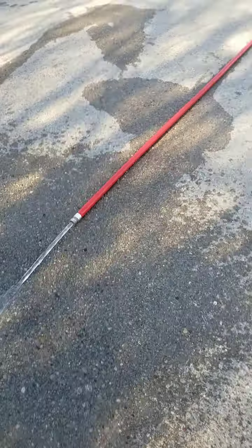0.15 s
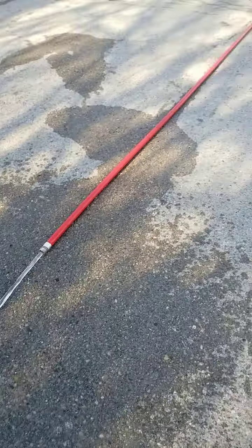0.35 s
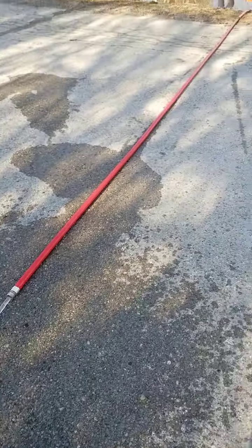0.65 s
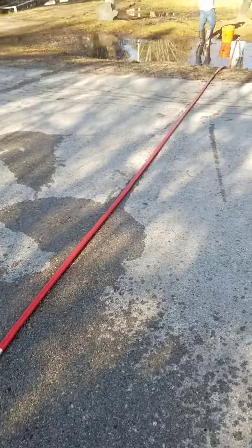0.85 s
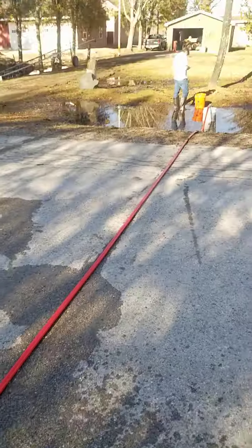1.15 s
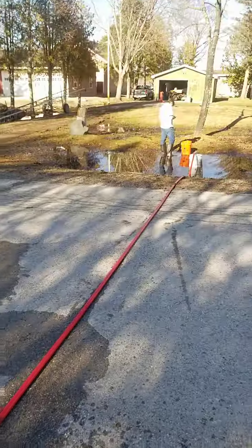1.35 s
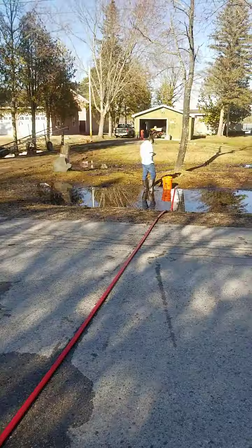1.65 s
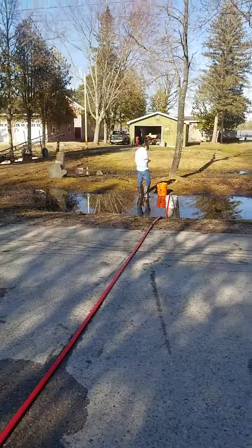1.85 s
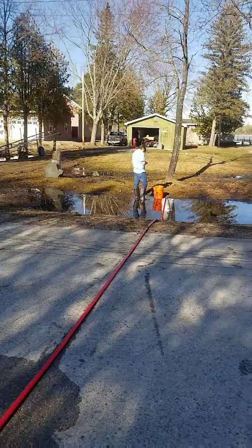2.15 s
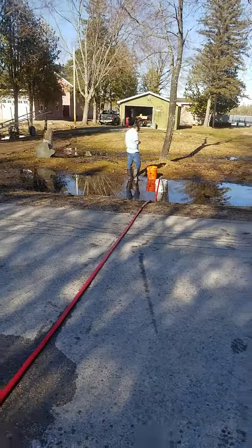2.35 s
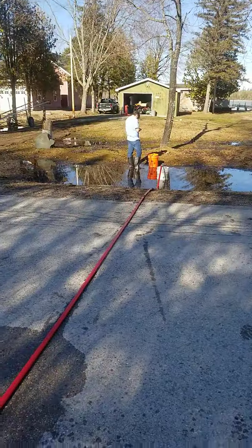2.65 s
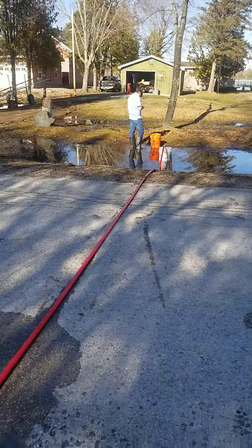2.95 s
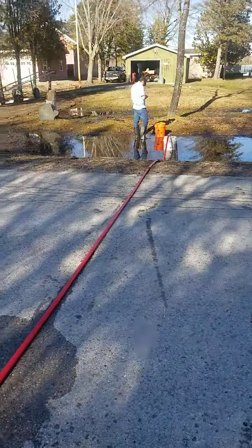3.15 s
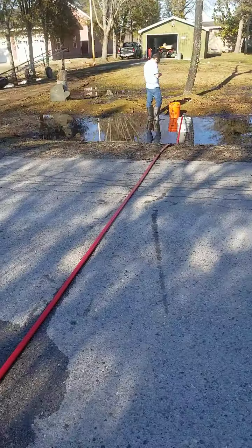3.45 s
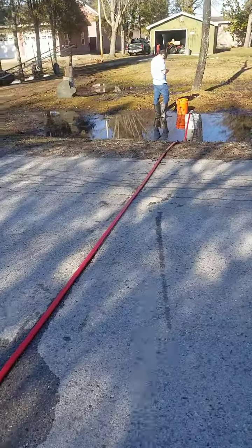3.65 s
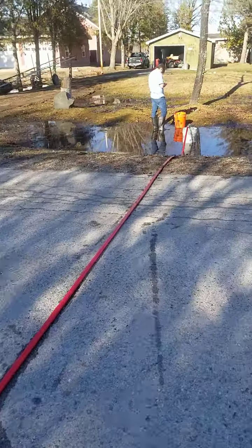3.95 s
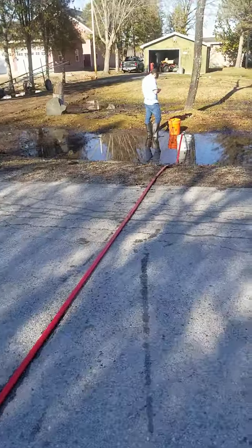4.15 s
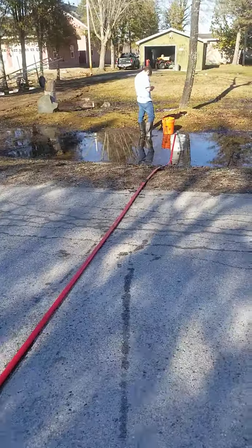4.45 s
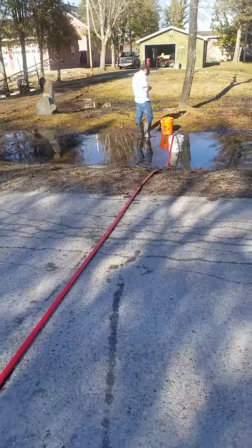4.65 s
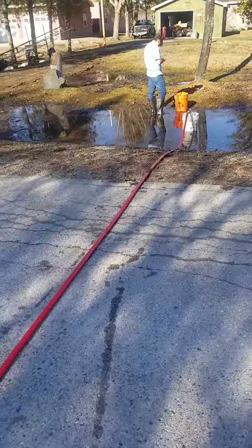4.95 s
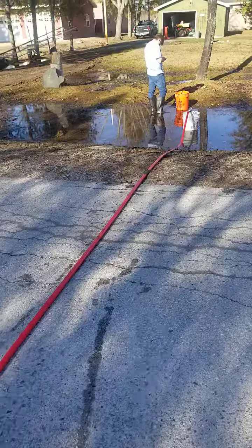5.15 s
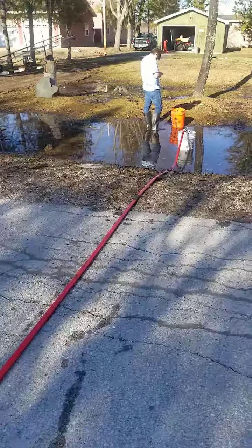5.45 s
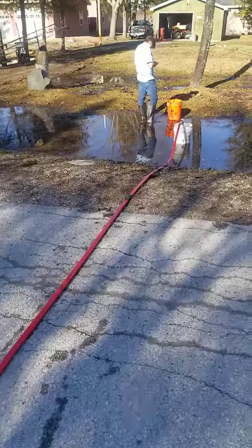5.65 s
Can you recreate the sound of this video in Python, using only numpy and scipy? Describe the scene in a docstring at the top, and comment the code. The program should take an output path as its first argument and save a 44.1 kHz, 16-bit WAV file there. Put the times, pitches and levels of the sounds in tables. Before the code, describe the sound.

Close, dense water spray dominates, a steady wide-band hiss with fine droplet crackle and little bubble plops, leaning right. Knocks on the handheld stereo device open the scene. After about three seconds, footsteps scuff sandy pavement and the spray gradually fades and dulls; low, ragged wind buffets thump the microphone, especially its right side. Distant motors drone faintly outdoors, and one soft bird whistle comes near the end.

```python
"""Hose spray on a paved road

Pumped water jets from a hose and spatters; random ticks and ringing bubbles make the splash, to the right.
The listener turns away and walks toward the pump, so the spray fades and dulls.
Pump and engine hum far off as wavering partials over coloured-noise air; a gliding sine is one bird call.
Noise gusts and short swings of pressure buffet two microphone ports; struck resonances make the knocks,
plops and grit, and coloured grains the scuffing soles."""
import sys
import numpy as np
from scipy import signal
from scipy.fft import rfft, irfft, next_fast_len
from scipy.io import wavfile
from scipy.ndimage import uniform_filter1d, map_coordinates

SR = 44100
rng = np.random.default_rng(int(sys.argv[2]) if len(sys.argv) > 2 else 0)


def master_out(mix):
    """Clip the mix to full scale and print it as 16-bit PCM to the path in sys.argv[1]."""
    frames = np.transpose(np.atleast_2d(mix))
    ceiling = np.clip(frames, -1, 1)
    pcm = np.round(ceiling * 32767).astype(np.int16)
    wavfile.write(sys.argv[1], SR, pcm)


N = 255548
TIME = np.arange(N) / SR  # s

# Spray bearing and how unlike the two ports sound: time_s, left_port_lag_ms, relative_width
BEARING = [(0, 0.15, 15), (.22, 0.22, 2.2), (.4, 0.26, 1.9), (.65, .3, 5.2), (.95, 0.37, 5.8),
           (1.3, 0.44, 1.2), (1.55, 0.47, 0.87), (1.85, 0.47, 0.59), (2.45, 0.45, 0.54), (3.05, 0.46, 1.4),
           (3.6, 0.477, 0.39), (4.15, 0.51, 0.21), (4.8, 0.49, 0.29), (5.15, 0.49, 1.2), (5.79, 0.49, 3.5)]
# Splash loudness where the listener first stands: time_s, level_db
JET_LEVEL = [(0, -1.7), (.35, -0.25), (1.05, -0.36), (2.1, -0.5), (2.65, 0.77), (3.4, 0.5)]
# Base splash spectrum at each port: freq_hz, density_db_per_hz
SPLASH_LEFT = [(700, -106), (1000, -94.5), (1400, -86.5), (1900, -78.4), (2600, -73.2), (3700, -74.8),
               (4900, -78.3), (6200, -83.5), (6900, -84.3), (7800, -82), (9000, -89.5), (10500, -87.5),
               (12500, -84.3), (15600, -84)]
SPLASH_RIGHT = [(700, -106), (1000, -95), (1400, -87.5), (1900, -78.3), (2700, -72.3), (4600, -72.7),
                (5300, -73.8), (6300, -70.8), (6900, -75), (7950, -66.8), (9100, -73), (10700, -69.2),
                (11400, -70.4), (12500, -65), (14500, -74), (15700, -83.5)]
# Splash power common to both ports at width 1: freq_hz, share_0_to_1
SPLASH_SHARED = [(2000, 0.97), (3300, 0.96), (4900, 0.93), (6000, 0.25), (8000, 0.56), (12000, 0.6),
                 (15500, 0)]
# Turn past the spray: time_s, heading (0 ahead, 1 beside, 2 behind)
HEADING = [(.7, 0.3), (1.5, 1.1), (3.55, 1), (4.05, 1.4)]
# Left-port phase lead from the path round the casing, per heading: freq_hz, lead_turns
LEAD_AHEAD = [(1700, -0.016), (2400, 0.0044), (3200, 0.021), (4900, 0.21), (5700, .35), (7900, 0.67)]
LEAD_BESIDE = [(1700, -0.0081), (2400, 0.00096), (3300, 0.0058), (4100, -0.039), (5700, .03), (6600, 0.34),
               (7900, 0.32), (10500, 0.77), (14500, 0.78)]
LEAD_BEHIND = [(1700, 0.027), (2800, 0.064), (4100, 0), (4900, -0.17), (5700, -0.15), (7900, -0.12),
               (10500, 0.46), (14500, 1)]
# Bands of the hiss that weaken, or swell (negative loss), for a while:
# start_s, end_s, centre_hz, width_hz, left_loss_db, right_loss_db
DIPS = [(-0.5, 0.85, 3860, 447, 4.5, 1.5), (0, 0.86, 9800, 1000, 1.5, 1.5),
        (-0.3, 2.25, 13500, 710, -0.5, 2.5), (1.15, 4.2, 3280, 170, -2, 0.5), (1, 3.84, 5700, 800, 4, 1),
        (3.5, 4.6, 4500, 770, -2.5, 1), (3, 4.6, 6900, 700, 3, -0.5), (3.7, 6.5, 9700, 800, 4, 1.5),
        (5, 6, 5500, 700, 2, -3)]
DIP_FADE_S = 0.44
# Broad dip cast by the casing on the right port: time_s, depth_db
CASING_SHADE = [(0, -2), (3.3, -0.5), (4.1, 1.5), (4.7, 8), (5.79, 12)]
CASING_SHADE_HZ, CASING_SHADE_WIDTH_HZ = 4780, 1220
# Treble shaded by the listener's body: time_s, left_loss_db, right_loss_db
BODY_SHADOW = [(1, 0, -1.5), (3.5, -1, -0.16), (4.4, 4, -0.4), (5.1, 12, 5), (5.3, 15, 10.5),
               (5.79, 21, 13)]
# Walk away from the splash
WALK_FROM_S, WALK_M_PER_S, SPLASH_DISTANCE_M = 3.14, 0.94, 1.064
# Extra left-port treble while facing the spray, lost on turning
FACING_DB, TURN_S = 9, 0.69
# Grip shift takes treble from the right port: a finger shades it, then eases off
GRIP_S, GRIP_TAKES_S, OPEN_PORT_DB = 0.14, 0.037, 1.5
GRIP_SHADE_DB, GRIP_EASE_S = 3, 0.43

# Partials of the mains pump motor: multiple, level_db
PUMP_PARTIALS = [(2, -69), (4, -66.5), (6, -78), (10, -57), (14, -86)]
PUMP_HZ = 60.15
# Partials of the far engine: multiple, level_db
ENGINE_PARTIALS = [(2, -68.5), (3, -63), (4, -69), (7, -74), (8, -83)]
ENGINE_HZ = 77.4
# Outdoor air and the pump's churning: freq_hz, density_db_per_hz
AIR_COLOUR = [(25, -86), (60, -110), (130, -85.5), (240, -77.5), (330, -88), (430, -91), (620, -82.5),
              (730, -87.5), (850, -94.5), (1100, -94), (2000, -104.5), (5000, -106), (15000, -116)]
# Far sounds during the walk toward the pump: time_s, gain_db
APPROACH = [(0, -1.5), (2.2, -2), (3.3, -0.5), (5.79, 2)]

# Wind rumble spectrum before levelling: freq_hz, density_db_per_hz
WIND_COLOUR = [(20, -36), (31, -10), (43, 0.5), (66, 5.5), (100, -3.5), (140, -11), (250, -21.5),
               (500, -40.5), (1500, -43.5)]
# Gusts: start_s, hold_s, left_level_db, right_level_db
GUSTS = [(0.02, 0.55, -68, -56), (0.687, 0.12, -54, -57), (.9, 0.78, -79, -66), (2.197, 0.094, -66, -56),
         (2.647, 0.51, -56, -47), (2.98, 0.067, -38, -35), (3.22, .25, -59, -54), (3.53, .15, -71, -40.5),
         (3.853, 0.45, -56, -34.5), (4.39, 0.44, -49, -47), (4.917, 1, -47.5, -36.5)]
GUST_ATTACK_S, GUST_RELEASE_S = 0.049, 0.043
BREEZE_LEFT_DB, BREEZE_RIGHT_DB = -76, -72
# Single eddies, before raggedness: start_s, pitch_hz, left_peak_db, right_peak_db
BUFFETS = [(.135, 95, -43, -41), (0.164, 185, -39, -50), (.182, 200, -45, -54), (.238, 64, -56, -39),
           (0.416, 57, -64, -35), (.695, 69, -35, -58), (0.764, 100, -46, -56), (1.193, 70, -65, -51),
           (2.568, 105, -47, -60), (2.641, 70, -59, -41), (2.821, 54.7, -49, -30), (2.907, 68, -35.5, -48),
           (2.968, 141, -24, -22), (3.008, 190, -34, -29), (3.036, 161, -31, -28), (3.048, 177, -32, -28),
           (3.061, 150, -34, -27.5), (3.197, 125.8, -35, -31.5), (3.683, 75, -46, -38),
           (3.83, 85, -38, -32), (3.93, 124.8, -42, -30.5), (3.968, 111, -46, -27), (4.074, 68, -40, -28),
           (4.275, 70, -53, -35), (4.589, 65.5, -39, -36), (4.669, 162, -34, -31.5),
           (4.731, 73.2, -34, -31), (4.975, 76, -50, -24), (5.143, 114, -38, -27.5), (5.295, 127, -31, -29),
           (5.361, 62, -44, -18), (5.653, 65, -52, -25.5), (5.762, 111.7, -53, -24)]

# Knocks and rubs on the casing, before its thud:
# start_s, pitch_hz, decay_s, left_peak_db, right_peak_db
KNOCKS = [(.012, 835, 0.00088, -25.5, -49), (.094, 1110, 0.0016, -37, -36), (.127, 655, 0.02, -29.5, -46),
          (.1445, 460, 0.0012, -22.5, -37), (.842, 584, 0.005, -36, -58), (1.568, 560, 0.0031, -35, -53),
          (2.240, 575, 0.031, -34, -59), (2.972, 600, 0.005, -39, -36), (3.020, 845, 0.006, -42, -39),
          (3.043, 1110, 0.0037, -40, -40), (3.199, 600, .004, -49, -49), (3.867, 1010, .002, -44, -45),
          (3.905, 792, 0.0034, -44, -41), (4.312, 900, 0.0025, -46, -40), (4.585, 1000, .002, -52, -45),
          (4.910, 1690, .003, -35, -34), (5.30, 388, 0.011, -39, -42.5)]
# Larger bubbles in the puddle: start_s, pitch_hz, decay_s, left_peak_db, right_peak_db
PLOPS = [(.949, 2300, 0.0036, -33, -33), (2.336, 1630, .003, -37, -46), (3.123, 2080, .003, -33, -31),
         (3.167, 2100, .003, -32, -30), (3.237, 1920, 0.0036, -32, -29)]
# Soles on the sandy road: start_s, length_s, level_db
SCUFFS = [(1.25, 0.5, -62), (2.08, .32, -64.5), (3.148, 0.38, -59), (3.95, 0.31, -64), (5.15, 0.4, -57.5)]
# Scuff spectrum before levelling: freq_hz, density_db_per_hz
SCUFF_COLOUR = [(150, -14), (400, 3.5), (900, 1), (1500, -3), (3000, -15), (8000, -32)]
# Grit ticks on the road: start_s, pitch_hz, decay_s, left_peak_db, right_peak_db
GRIT = [(3.988, 12000, 0.0025, -39, -19), (4.487, 11500, .003, -41, -22), (4.518, 13000, .008, -40, -27),
        (5.228, 12500, 0.0045, -44, -28)]
CUTOFF_HZ = 15900


def from_db(db):
    """Decibels to gain."""
    return 10 ** (np.asarray(db) / 20)


def rms_one(x):
    """Scale to rms 1."""
    return x / np.sqrt(np.mean(x ** 2) + 1e-20)


def in_time(rows, times_s=TIME):
    """Interpolate the columns of a curve at the given times."""
    knots_s, *columns = np.transpose(rows)
    return np.array([np.interp(times_s, knots_s, column) for column in columns])


def at_hz(points, hz):
    """Interpolate a spectrum on a log-frequency axis."""
    knots_hz, value = np.transpose(points)
    return np.interp(np.log(hz + 1), np.log(knots_hz), value)


def drift(rate_hz):
    """Smooth random curve of rms 1 with rate_hz knots a second."""
    knots = rng.standard_normal(4096)
    return rms_one(map_coordinates(knots, [TIME * rate_hz], order=3, mode="wrap"))


def colour(x, spectrum):
    """Filter x so that white input of rms 1 gets the spectrum in dB per Hz."""
    size = next_fast_len(N)
    hz = np.fft.rfftfreq(size, 1 / SR)
    shaped = irfft(rfft(x, size) * from_db(at_hz(spectrum, hz)), size)
    return shaped[..., :N] * np.sqrt(SR / 2)


def resonate(x, hz, width_hz):
    """Two-pole resonance with gain 1 on top."""
    r = np.exp(-np.pi * width_hz / SR)
    numerator = np.array([1, 0, -1]) * (1 - r * r) / 2
    denominator = [1, -2 * r * np.cos(2 * np.pi * hz / SR), r * r]
    return signal.lfilter(numerator, denominator, x + 1e-18)


def drops(per_s, spread_db):
    """Impacts at random moments: many small, few large."""
    sizes = from_db(spread_db * np.minimum(rng.exponential(1, N), 6))
    signs = rng.choice([-1, 1], N)
    return sizes * signs * (rng.random(N) < per_s / SR)


def spatter(per_s, spread_db, bubbles_per_s, bubble_db, bubble_cycles, clump_db):
    """Drops tick on the road in clumps; small bubbles in the water film burst and ring briefly."""
    ticks = rms_one(drops(per_s, spread_db) * from_db(clump_db * drift(260)))
    bursts = drops(bubbles_per_s, spread_db)
    pitches_hz = np.geomspace(1500, 6000, 30)
    pitch_index = rng.integers(0, 30, N)
    rings = 0
    for k, hz in enumerate(pitches_hz):
        rings = rings + resonate(bursts * (pitch_index == k), hz, hz / bubble_cycles)
    return rms_one(ticks + from_db(bubble_db) * rms_one(rings))


def lead_by_heading(tables, hz, times_s):
    """Blend the ahead, beside and behind phase leads as the listener turns."""
    heading = np.clip(in_time(HEADING, times_s)[0], 0, 2)
    lead_turns = 0
    for k, table in enumerate(tables):
        weight = np.clip(1 - np.abs(heading - k), 0, 1)
        lead_turns = lead_turns + at_hz(table, hz) * weight
    return lead_turns


def spray_levels(times_s):
    """Splash and per-port treble levels in dB: all fall with distance, treble also with turning away."""
    walked_m = WALK_M_PER_S * np.maximum(times_s - WALK_FROM_S, 0)
    distance_ratio = np.hypot(1, walked_m / SPLASH_DISTANCE_M)
    splash_db = in_time(JET_LEVEL, times_s)[0] - 20 * np.log10(distance_ratio)
    left_shadow_db, right_shadow_db = in_time(BODY_SHADOW, times_s)
    facing_db = FACING_DB * np.exp(-times_s / TURN_S)
    gripped = np.clip((times_s - GRIP_S) / GRIP_TAKES_S, 0, 1)
    finger_db = gripped * GRIP_SHADE_DB * np.exp((GRIP_S - times_s) / GRIP_EASE_S)
    open_db = OPEN_PORT_DB * (1 - gripped) - finger_db
    left_treble_db = splash_db + facing_db - left_shadow_db
    right_treble_db = splash_db + open_db - right_shadow_db
    return splash_db, left_treble_db, right_treble_db


def port_dips(hz, times_s):
    """Per-port loss in dB: bands of the hiss that weaken or swell for a while."""
    loss_db = 0
    for start_s, end_s, centre_hz, width_hz, *ports_db in DIPS:
        edge_s = np.minimum(times_s - start_s, end_s - times_s)
        present = np.clip(edge_s / DIP_FADE_S + .5, 0, 1)
        bell = np.exp(-((hz - centre_hz) / width_hz) ** 2 / 2)
        loss_db = loss_db + np.multiply.outer(ports_db, present * bell)
    return loss_db


def spray(surge_db, flicker_db, gurgle_db, treble_from_hz, treble_full_hz):
    """Jet breaks into slugs; the splash centre reaches both ports, its wide fringe each port differently."""
    patches = np.array([spatter(per_s=19000, spread_db=3.0, bubbles_per_s=1300, bubble_db=-14.0,
                                bubble_cycles=27, clump_db=.5) for _ in range(3)])
    patches = patches * from_db(surge_db * drift(30.42))
    hz, times_s, (centre, *fringe) = signal.stft(patches, SR, nperseg=256, noverlap=192)
    hz = hz[:, None]

    lag_ms, width = in_time(BEARING, times_s)
    share = np.clip(at_hz(SPLASH_SHARED, hz), .01, 1) ** np.abs(width)
    lead_turns = lead_by_heading([LEAD_AHEAD, LEAD_BESIDE, LEAD_BEHIND], hz, times_s)
    left_turns = lead_turns - hz * lag_ms / 1000
    direct = np.array([centre * np.exp(2j * np.pi * left_turns), centre])
    ports = np.sqrt(share) * direct + np.sqrt(1 - share) * np.array(fringe)

    # body and casing shade short waves, so treble fades sooner
    splash_db, *treble_db = spray_levels(times_s)
    treble = np.clip((hz - treble_from_hz) / (treble_full_hz - treble_from_hz), 0, 1)
    level_db = (1 - treble) * splash_db + treble * np.array(treble_db)[:, None]
    level_db = level_db - port_dips(hz, times_s)
    shade_bell = np.exp(-((hz - CASING_SHADE_HZ) / CASING_SHADE_WIDTH_HZ) ** 2 / 2)
    level_db[1] -= in_time(CASING_SHADE, times_s)[0] * shade_bell

    # fine spray puffs; heavier water sloshes at its own pace
    puffs = np.interp(times_s, TIME, drift(150))
    slosh = np.interp(times_s, TIME, drift(60))
    level_db = level_db + flicker_db * treble * hz / treble_full_hz * puffs
    level_db = level_db + gurgle_db * (1 - treble) * slosh

    shaped = ports * from_db(level_db)
    left, right = signal.istft(shaped, SR, nperseg=256, noverlap=192)[1][:, :N]
    return np.array([colour(left, SPLASH_LEFT), colour(right, SPLASH_RIGHT)])


def machine(hz, partials, wander, waver_db, sway_turns, pan_db):
    """Far steady rotor: echoes and moving air make partials waver, a little differently at each port."""
    turns = np.cumsum(hz * (1 + wander * drift(8))) / SR
    hum = np.zeros((2, N))
    for multiple, level_db in partials:
        sway = sway_turns * drift(8.9) * [[1], [-1]]
        phase_turns = round(multiple) * turns + rng.random() + sway
        gain = from_db(level_db + waver_db * drift(14)) * np.sqrt(2)
        hum += gain * np.sin(2 * np.pi * phase_turns)
    return hum * from_db([[pan_db / 2], [-pan_db / 2]])


def pump():
    """Mains motor: harmonics of its slightly wandering rate."""
    return machine(PUMP_HZ, PUMP_PARTIALS, wander=0.003, waver_db=-1.5, sway_turns=0.034, pan_db=2.5)


def engine():
    """Far engine: harmonics of its slightly wandering rate."""
    return machine(ENGINE_HZ, ENGINE_PARTIALS, wander=0.00356, waver_db=1.5, sway_turns=0.017, pan_db=-4.0)


def air(side_db, pan_db):
    """Far background: coloured noise, nearly alike at both ports."""
    mid, side = colour(rng.standard_normal((2, N)), AIR_COLOUR)
    ports = mid + from_db(side_db) * side * [[1], [-1]]
    return ports * from_db([[pan_db / 2], [-pan_db / 2]])


def wind_strength():
    """Gain at each port: each gust swells, holds and dies away over a light breeze."""
    power = from_db([[BREEZE_LEFT_DB], [BREEZE_RIGHT_DB]]) ** 2
    for start_s, hold_s, *ports_db in GUSTS:
        before_s = np.maximum(start_s - TIME, 0)
        after_s = np.maximum(TIME - start_s - hold_s, 0)
        envelope = np.exp(-before_s / GUST_ATTACK_S - after_s / GUST_RELEASE_S)
        power = power + (from_db(ports_db)[:, None] * envelope) ** 2
    return np.sqrt(power)


def wind(lumpy_db):
    """Turbulence rumbles in each port separately; gusts set its strength."""
    rumble = np.array([colour(rng.standard_normal(N), WIND_COLOUR) * from_db(lumpy_db * drift(50))
                       for _ in range(2)])
    running_rms = np.sqrt(uniform_filter1d(rumble ** 2, size=5000))
    return rumble / running_rms * wind_strength()


def contacts(rows, width_share, scrape):
    """Sharp touch plus a short decaying scrape, coloured by a broad resonance."""
    out = np.zeros((2, N))
    age_s = np.arange(4096) / SR
    for start_s, hz, decay_s, *ports_db in rows:
        rub = rng.standard_normal(len(age_s)) * np.exp(-age_s / decay_s)
        force = (age_s == 0) + scrape * rub
        width_hz = hz * width_share
        knock = resonate(resonate(force, hz, width_hz), hz, 2 * width_hz)
        start = max(round(start_s * SR), 0)
        out[:, start:start + len(knock)] += from_db(ports_db)[:, None] * knock / np.abs(knock).max()
    return out


def handling(thud_hz, thud_width_hz, thud_db):
    """Hand knocks also shake the whole casing, adding a short low thud."""
    knocks = contacts(KNOCKS, width_share=0.56, scrape=0.13)
    thud = resonate(resonate(knocks, thud_hz, thud_width_hz), thud_hz, thud_width_hz)
    return knocks + from_db(thud_db) * thud


def buffets(rise_cycles):
    """An eddy swings the pressure for two or three cycles; its ragged edge spreads upward."""
    out = np.zeros((2, N))
    ragged = 1 + 0.18 * np.array([drift(600), drift(600)])
    for start_s, hz, *ports_db in BUFFETS:
        cycles = np.clip((TIME - start_s) * hz, 0, 20)
        rise = cycles / rise_cycles
        swell = (rise * np.exp(1 - rise)) ** 2
        out += from_db(ports_db)[:, None] * swell * np.sin(2 * np.pi * cycles)
    return out * ragged


def plops():
    """Larger puddle bubbles: struck resonances with a faint scrape."""
    return contacts(PLOPS, width_share=0.19, scrape=0.058)


def footsteps(grains_per_s, spread_db, side_db):
    """Sand crunches under the sole, swelling and fading as the foot rolls."""
    mid, side = (rms_one(colour(drops(grains_per_s, spread_db), SCUFF_COLOUR)) for _ in range(2))
    pressure = 0
    for start_s, length_s, level_db in SCUFFS:
        along = np.clip((TIME - start_s) / length_s, 0, 1)
        pressure = pressure + from_db(level_db) * np.sin(np.pi * along)
    return pressure * (mid + from_db(side_db) * side * [[1], [-1]])


def grit():
    """Grit ticks on the road: broad high resonances with a strong scrape."""
    return contacts(GRIT, width_share=0.76, scrape=.7)


def bird(start_s, length_s, from_hz, to_hz, level_db):
    """One faint, slightly falling whistle: a gliding sine that swells and fades."""
    along = np.clip((TIME - start_s) / length_s, 0, 1)
    pitch_hz = from_hz + (to_hz - from_hz) * along
    return from_db(level_db) * np.sin(np.pi * along) * np.sin(2 * np.pi * np.cumsum(pitch_hz) / SR)


def scene():
    """Spray in front of the far sounds; wind and handling at the ports."""
    water = spray(surge_db=0.33, flicker_db=0.68, gurgle_db=0.73, treble_from_hz=3070, treble_full_hz=9450)
    far = pump() + engine() + air(side_db=-9.0, pan_db=1.0)
    far = far + bird(start_s=5.405, length_s=0.205, from_hz=1665, to_hz=1605, level_db=-56.5)
    far = far * from_db(in_time(APPROACH))
    at_ports = wind(lumpy_db=2.5) + buffets(rise_cycles=0.78)
    at_ports = at_ports + handling(thud_hz=190, thud_width_hz=227, thud_db=3.0)
    road = plops() + footsteps(grains_per_s=1500, spread_db=2.5, side_db=-3) + grit()
    return water + far + at_ports + road


def record(dry):
    """Steep elliptic low-pass cuts the top."""
    lowpass = signal.ellip(14, .1, 90, CUTOFF_HZ, fs=SR, output="sos")
    return signal.sosfilt(lowpass, dry)


dry = scene()
out = record(dry)
master_out(out)
```